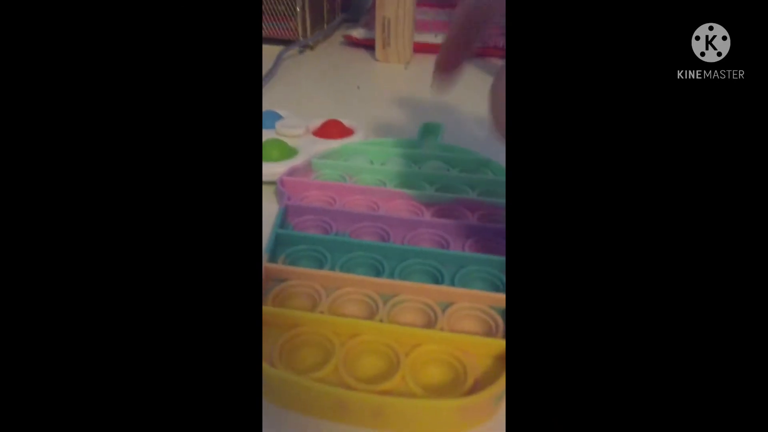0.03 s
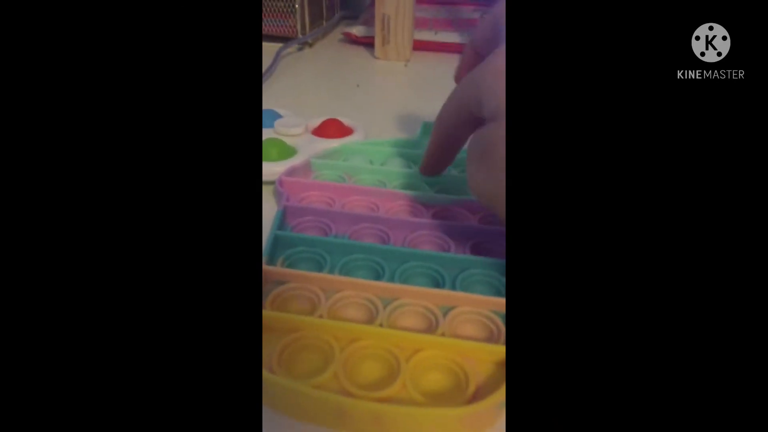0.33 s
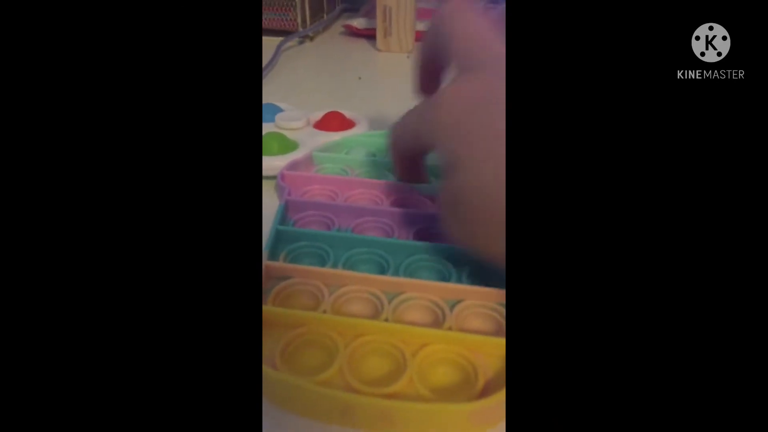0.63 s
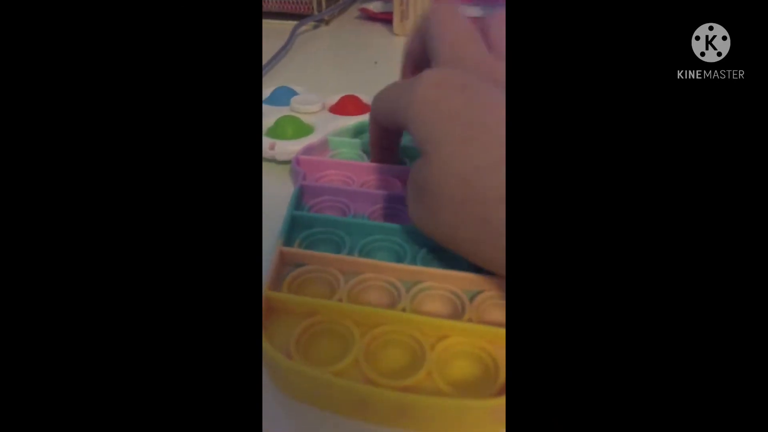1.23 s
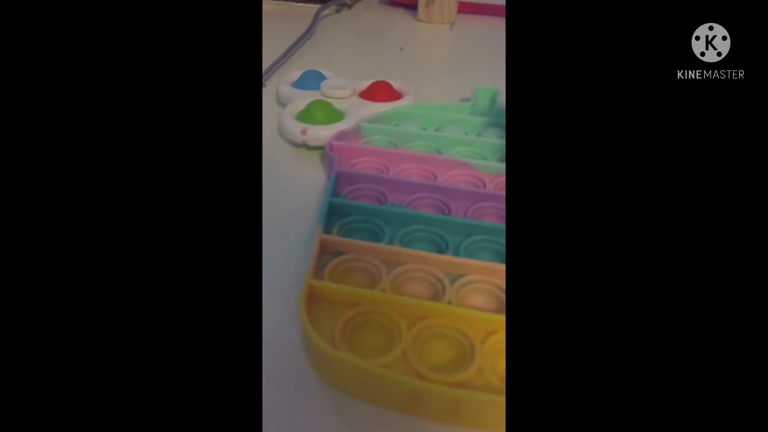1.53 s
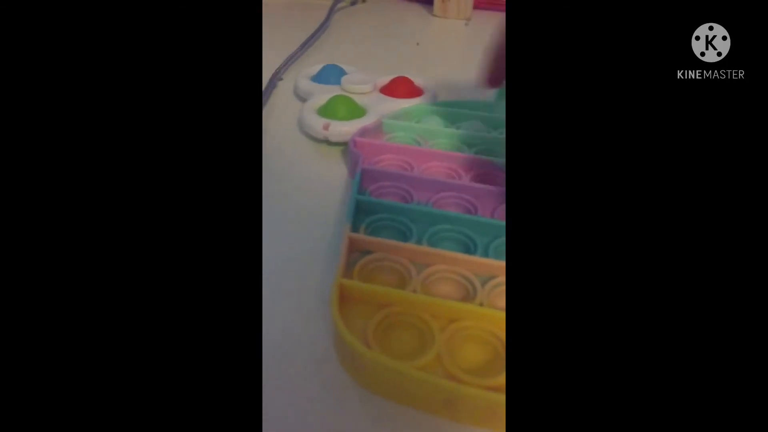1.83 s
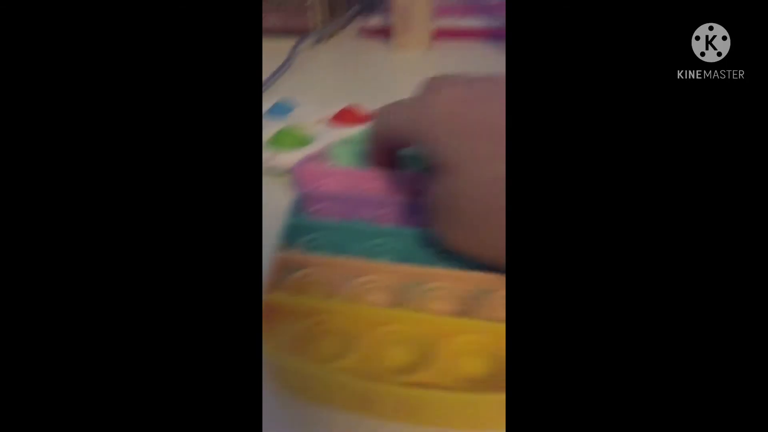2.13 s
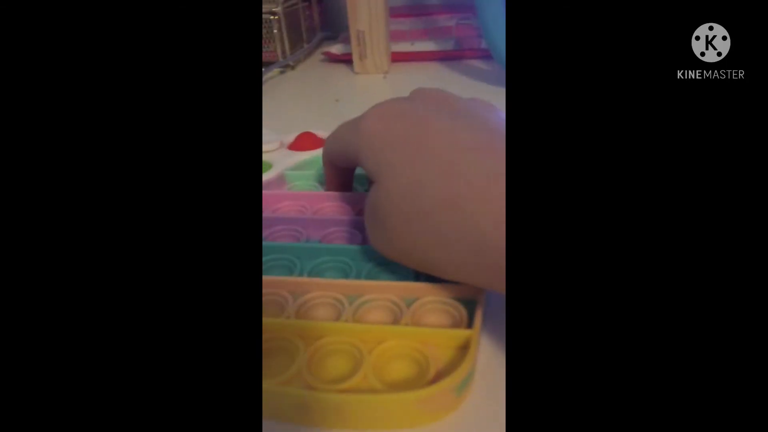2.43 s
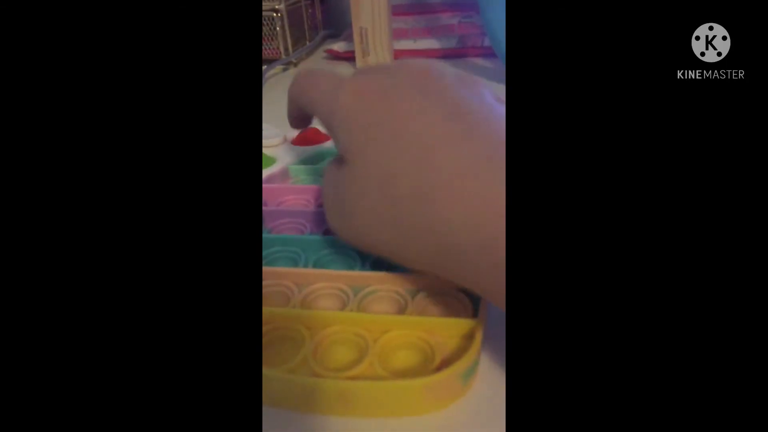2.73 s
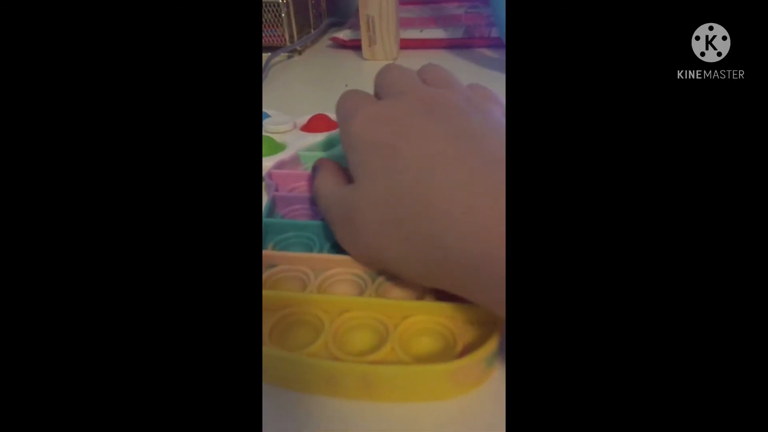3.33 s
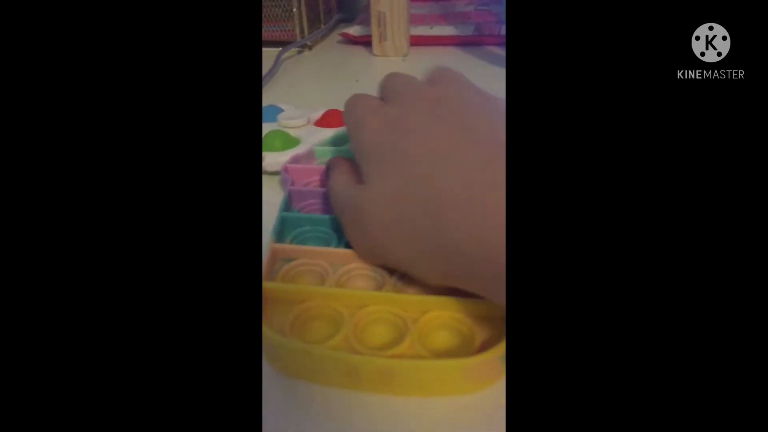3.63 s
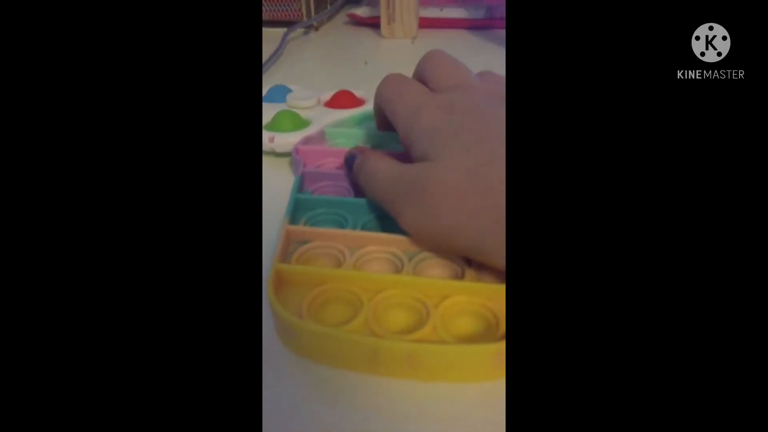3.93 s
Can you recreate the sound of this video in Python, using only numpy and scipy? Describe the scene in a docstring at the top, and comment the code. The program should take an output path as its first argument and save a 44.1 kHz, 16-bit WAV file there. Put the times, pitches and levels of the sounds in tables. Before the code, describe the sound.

Bubbles of a silicone toy pop under fingers, once loudly with a hollow thump, then more softly between faint squeaks. The toy finally knocks hard on the table, heard close up in a small room with a low hum.

```python
"""Fingers push the bubbles of a silicone pop toy on a table, in a quiet room with hiss and a low hum.
First skin rubs and soft presses squeak. At 1.6 s a dome buckles loudly: tiny snaps ring the air
in its cup, and the rubber thumps the table and bounces. Softer pops follow until 2.8 s, then
squeaks, rubs and faint thumps. At 3.8 s a last dome snaps and the toy knocks hard on the table."""
import sys
import numpy as np
from scipy import signal
from scipy.fft import rfft, irfft
from scipy.io import wavfile

SR = 44100
rng = np.random.default_rng(int(sys.argv[2]) if len(sys.argv) > 2 else 0)


def int16_out(signal):
    """Quantize to a 16-bit WAV file."""
    q = np.round(np.clip(np.atleast_2d(signal).T, -1, 1) * 32767)
    wavfile.write(sys.argv[1], SR, q.astype(np.int16))


N = 176400

# dome snaps: start_s, cup_hz, cup_db, overtone_hz, overtone_db, crack_db, flap_db
DOME_SNAPS = [(1.4469, 1690, -38, 2670, -48, -67, -43), (1.456, 1660, -38, 2630, -48, -66, -60),
              (1.636, 1630, -16.5, 2900, -28.5, -30, -25), (1.6473, 1730, -18.5, 2880, -25, -30.5, -15.5),
              (2.091, 1290, -31, 2440, -48, -57, -33), (2.107, 1630, -42, 2880, -49, -58, -42),
              (2.1161, 1620, -35.5, 2980, -46, -64, -35), (2.264, 925, -39, 2270, -42.5, -57, -33.5),
              (2.2703, 1400, -56, 2980, -39.5, -48, -46), (2.2823, 1190, -47, 2900, -65, -62, -35.5),
              (2.289, 1300, -44, 2850, -62, -62, -44), (2.293, 1350, -42, 3000, -56, -61, -54),
              (2.4558, 1470, -47, 3780, -50, -56, -67), (2.468, 1430, -46.5, 4400, -51, -51, -66.5),
              (2.7869, 1750, -46.5, 2960, -57, -70, -36.5), (3.81, 1350, -41, 2950, -62, -42, -40),
              (3.818, 1420, -35, 2320, -38, -43, -49), (3.823, 1750, -29.5, 2430, -36, -50, -31)]
# rubber flap: freq_hz, density_db
FLAP_SPECTRUM = [(50, -35), (220, 2), (500, -6), (1000, 2), (1400, 3.5), (2200, -9), (3500, -14.5),
                 (8000, -42)]
# rubber crack: freq_hz, density_db
CRACK_SPECTRUM = [(500, -36), (2200, -7), (3600, 6.5), (4700, -5), (5600, -4.5), (6300, -22), (8500, -17),
                  (11000, -27), (16000, -33)]
# firm presses: start_s, table_db, slap_db, slap_hz
TABLE_THUMPS = [(.323, -59.5, -49, 490), (1.19, -52, -33, 178), (1.634, -58, -26.5, 210),
                (1.648, -25.5, -19, 161), (1.6536, -48, -15, 432), (2.092, -25, -18, 136.5),
                (2.109, -43, -21.5, 177), (2.271, -38.5, -28, 154), (2.472, -53, -35.5, 142),
                (2.949, -61, -40, 165), (3.019, -55.5, -37, 127), (3.828, -35.5, -41, 476),
                (3.858, -46, -22, 249)]
# table resonances: freq_hz, level_db, t60_s
TABLE_MODES = [(124.7, -0.5, 0.25), (200, -2.5, 0.098), (303, -14, 0.24), (452, -12, 0.13),
               (610, -20, 0.035)]
# rubber sheet thud: freq_hz, density_db
THUD_SPECTRUM = [(60, -55), (160, 9.5), (300, -12), (480, 2), (750, -6), (1250, -12), (3000, -29),
                 (6000, -50)]
# slack dome landings: start_s, level_db
DOME_BOUNCES = [(0.5632, -40), (1.2023, -39.5), (1.6567, -15.5), (2.2835, -32.5)]
# one hollow tap: freq_hz, density_db
BOUNCE_SPECTRUM = [(100, -17), (230, -4.5), (400, -2), (510, 5), (640, -4), (900, -8.5), (2500, -29),
                   (6000, -60)]
# toy on table: start_s, level_db, ring_share, lowpass_hz
TOY_KNOCKS = [(3.8506, -11, 0.22, 1420), (3.8574, 0.5, 0.37, 13000)]
# knock resonances: freq_hz, level_db, t60_s
KNOCK_RING_MODES = [(1225, -18, .05), (1380, -7, 0.037), (1712, -25, .05), (1812, -15, 0.053),
                    (2057, -25, 0.14), (2380, -30, 0.042), (2592, -16, 0.035), (3250, -33, 0.1),
                    (3490, -27, 0.045)]
# knock impact: freq_hz, density_db
BLOW_SPECTRUM = [(40, -35), (150, -18), (310, -8), (550, -9), (850, -14), (1300, -4), (2300, -5),
                 (3700, -5), (4400, -24), (8700, -31), (11000, -43), (16000, -40)]
# grit and rattle after impact: freq_hz, density_db
RATTLE_SPECTRUM = [(80, -27), (320, 6.5), (600, 6), (900, -9.5), (1300, 4.5), (3500, 1), (4300, -8),
                   (5700, -18), (7200, -29), (8700, -9.5), (10700, -32), (13500, -17), (16000, -38)]
# soft presses: peak_s, length_s, pitch_hz, fall_oct_per_length, level_db, overtone_db
RUBBER_SQUEAKS = [(0.108, 0.02, 1794, -0.29, -58, -60.5), (0.556, 0.0083, 1660, 0.13, -39, -65),
                  (1.025, 0.014, 1380, -0.056, -57, -58), (1.0313, 0.0036, 1340, .03, -58, -40.5),
                  (1.1888, 0.0039, 1282, .03, -50, -39.5), (1.1964, 0.012, 1250, 0.014, -50, -45),
                  (1.933, 0.0056, 1600, .4, -41.5, -69), (1.941, 0.0092, 1576, 0.21, -44, -69),
                  (1.9486, 0.0048, 1630, -0.082, -43, -68), (2.954, 0.004, 1340, 0.15, -44.5, -54),
                  (2.966, 0.0064, 1420, 0.17, -51, -58), (3.3488, 0.0083, 1720, .03, -43.5, -59),
                  (3.3605, 0.0085, 1710, -0.017, -44.5, -66), (3.427, 0.0064, 1780, .3, -38, -61),
                  (3.436, 0.011, 1045, 0.31, -42.5, -60)]
# finger strokes: start_s, length_s, level_db, lowpass_hz
SKIN_RUBS = [(-.03, 0.11, -53.5, 1620), (0.045, .018, -53.5, 5000), (0.784, 0.062, -58, 11000),
             (0.999, 0.038, -59, 5240), (1.18, 0.034, -54, 11000), (2.255, 0.028, -51, 9000),
             (2.664, 0.05, -57.5, 3040), (3.078, 0.022, -56.5, 1990), (3.64, 0.037, -57, 2000)]
# skin on silicone: freq_hz, density_db
RUB_SPECTRUM = [(300, -14), (1200, 5.5), (2200, 0), (2900, 6.5), (3600, -0.5), (6500, -7.5), (8200, 3),
                (9100, -6), (16000, -30)]
# room decay: freq_hz, t60_s
ROOM_DECAY = [(100, 0.26), (400, 0.1436), (1500, 0.2656), (3000, 0.19), (8000, 0.21), (16000, 0.23)]
# echo colour: freq_hz, gain_db
ECHO_SPECTRUM = [(100, -10), (450, 11), (1200, -3.5), (1650, -7), (2300, 5.5), (3500, -0.5), (8000, 0),
                 (16000, -2.5)]
# background hiss: freq_hz, density_db
HISS_SPECTRUM = [(20, -17), (45, -25), (65, -12.5), (85, 4), (115, -8), (225, -2), (275, -10.5), (320, -5),
                 (380, -9.5), (700, -15.5), (1600, -19.5), (3500, -21.5), (6200, -24.5), (6900, -28),
                 (8000, -25), (10900, -28.5), (13000, -27), (14700, -31.5)]
# background swell: time_s, level_db
HISS_LEVELS = [(0, -58.5), (.6, -59), (1.3, -56), (2.4, -54.5), (3.2, -53.5), (4, -53)]


def snaps(rise_s=0.00039, choke_s=0.012, cup_gain_db=9, overtone_gain_db=11, crack_gain_db=9):
    """A dome buckles. Returns the air ringing in its cup, and the rubber's flap and crack."""
    cups, rubber, t = np.zeros(N), np.zeros(N), np.arange(SR // 10) / SR
    rise = 1 - np.exp(-(t / rise_s) ** 2)
    choke = np.exp(-(t / choke_s) ** 2)  # fingertip closes the cup
    for start_s, cup_hz, cup_db, overtone_hz, overtone_db, crack_db, flap_db in DOME_SNAPS:
        tone = mode(t, cup_hz, cup_db + cup_gain_db, t60_s=0.013)
        overtone = mode(t, overtone_hz, overtone_db + overtone_gain_db, t60_s=0.014)
        add(cups, start_s, rise * choke * (tone + overtone))
        flap = amp(flap_db) * burst(FLAP_SPECTRUM, t, t60_s=0.043)
        crack = amp(crack_db + crack_gain_db) * burst(CRACK_SPECTRUM, t, t60_s=0.011)
        add(rubber, start_s, rise * (flap + crack))
    return cups, rubber


def slap(cycles, level_db, bend=0.59, bend_cycles=1.1, rise_cycles=0.84, t60_cycles=13.3):
    """Hollow note that starts sharp and sags as the rubber relaxes."""
    turns = cycles + bend * bend_cycles * (1 - np.exp(-cycles / bend_cycles))
    rise = 1 - np.exp(-(cycles / rise_cycles) ** 2)
    return amp(level_db - 60 * cycles / t60_cycles) * np.sin(2 * np.pi * turns) * rise


def thumps(rise_s=0.0017, thud_db=2.5, cutoff_ratio=2.65, highpass_hz=85):
    """Rubber slaps down and rings the table; a higher slap wakes higher modes."""
    out, t = np.zeros(N), np.arange(SR // 2) / SR
    rise = 1 - np.exp(-t / rise_s)
    for start_s, table_db, slap_db, slap_hz in TABLE_THUMPS:
        thud = amp(thud_db) * burst(THUD_SPECTRUM, t, t60_s=0.076, norm_samples=2048)
        table = lowpass((ring(TABLE_MODES, t) + thud) * rise, cutoff_ratio * slap_hz)
        add(out, start_s, amp(table_db) * table + slap(t * slap_hz, slap_db))
    return signal.sosfilt(signal.butter(4, highpass_hz, "high", fs=SR, output="sos"), out)


def bounces(count=4, gap_s=0.0098, gap_spread=0.25, loss_db=4.5):
    """A slack dome bounces on the table: hollow taps, unevenly spaced, each weaker."""
    out, tap = np.zeros(N), click(BOUNCE_SPECTRUM)
    for start_s, level_db in DOME_BOUNCES:
        for k, jitter in enumerate(rng.uniform(-1.016, 1, count)):
            add(out, start_s, amp(level_db - k * loss_db) * tap)
            start_s += gap_s * (1 + gap_spread * jitter)
    return out


def knocks(ring_s=0.081, blow_db=-1.5, rattle_db=-10.5, grit_db=-15.5):
    """The toy hits the table: a damped touch, then a hard blow that rings and rattles."""
    out, t = np.zeros(N), np.arange(SR // 4) / SR
    for start_s, level_db, ring_share, lowpass_hz in TOY_KNOCKS:
        rattle = amp(rattle_db) * burst(RATTLE_SPECTRUM, t, t60_s=0.036)
        grit = amp(grit_db) * burst(RATTLE_SPECTRUM, t, t60_s=0.015)
        damping = np.exp(-t / (ring_s * ring_share))
        hit = (ring(KNOCK_RING_MODES, t) + rattle + grit) * damping
        add(hit, 0, amp(blow_db) * click(BLOW_SPECTRUM))
        add(out, start_s, amp(level_db) * lowpass(hit, lowpass_hz))
    return out


def squeaks(overtone_hz=3004, overtone_fall_oct=0.1025, rise_share=0.67, grain_db=-3.5, rasp_db=-8):
    """Creeping rubber sings in the cup: two gliding tones, rubber grain and skin rasp."""
    out, t = np.zeros(N), np.arange(-SR // 40, SR // 40) / SR
    for peak_s, length_s, pitch_hz, fall_oct, level_db, overtone_db in RUBBER_SQUEAKS:
        progress = np.clip(t / length_s, -1, 1)
        tone = glide(pitch_hz, -fall_oct * progress)
        overtone = glide(overtone_hz, -overtone_fall_oct * progress)
        grain = amp(grain_db) * unit(noise(FLAP_SPECTRUM, len(t)))
        rasp = amp(rasp_db) * unit(noise(RUB_SPECTRUM, len(t)))
        swell = np.exp(-(2 * t / length_s / np.where(t < 0, rise_share, 1)) ** 2)
        squeak = amp(level_db) * (tone + grain) + amp(overtone_db) * (overtone + rasp)
        add(out, peak_s + t[0], swell * squeak)
    return out


def rubs(slips_per_s=4000):
    """Tiny slips of skin on rubber swell and fade with each stroke."""
    out, n = np.zeros(N), SR // 4
    for start_s, length_s, level_db, lowpass_hz in SKIN_RUBS:
        slips = rng.standard_normal(n) * (rng.random(n) < slips_per_s / SR)
        friction = unit(lowpass(colour(slips, RUB_SPECTRUM), lowpass_hz))[:int(length_s * SR)]
        swell = np.sin(np.linspace(0, np.pi, len(friction)))
        add(out, start_s, amp(level_db) * friction * swell)
    return out


def room_echoes(x, build_s=0.0017):
    """Diffuse small-room echoes; each band decays at its own rate."""
    hz, frame_s, bands = signal.stft(rng.standard_normal(SR // 2), SR, nperseg=256)
    decay = amp(-60 * frame_s / lookup(ROOM_DECAY, hz)[:, None])
    tail = signal.istft(bands * decay, SR, nperseg=256)[1]
    build = 1 - np.exp(-(np.arange(len(tail)) / SR / build_s) ** 2)
    tail = colour(tail * build, ECHO_SPECTRUM)
    return signal.fftconvolve(x, tail / np.linalg.norm(tail))[:N]


def room_tone(hum_hz=84.9, hum_width_hz=1.4, hum_vs_hiss_db=-11.5):
    """Soft hiss and a low wavering hum; both grow slowly."""
    hz = np.fft.rfftfreq(N, 1 / SR)
    hum = irfft(rfft(rng.standard_normal(N)) / (1 + ((hz - hum_hz) / hum_width_hz) ** 2), N)
    hiss = noise(HISS_SPECTRUM, N)
    level = amp(np.interp(np.arange(N) / SR, *np.transpose(HISS_LEVELS)))
    return level * (unit(hiss) + amp(hum_vs_hiss_db) * unit(hum))


def amp(db):
    return 10 ** (np.asarray(db) / 20)


def unit(x):
    """Scale to rms 1."""
    return x / np.sqrt(np.mean(x ** 2) + 1e-20)


def lookup(table, hz):
    """Interpolate over log frequency."""
    freq_hz, value = np.transpose(table)
    return np.interp(np.log(hz + 1), np.log(freq_hz + 1), value)


def add(mix, start_s, sound):
    """Mix in place, cropped at both ends."""
    at = round(start_s * SR)
    sound = sound[max(-at, 0):]
    part = mix[max(at, 0):][:len(sound)]
    part += sound[:len(part)]


def lowpass(x, cutoff_hz):
    return signal.lfilter(*signal.butter(2, min(cutoff_hz, 0.45 * SR), fs=SR), x)


def colour(x, spectrum):
    return irfft(rfft(x) * amp(lookup(spectrum, np.fft.rfftfreq(len(x), 1 / SR))), len(x))


def noise(spectrum, samples):
    return colour(rng.standard_normal(samples), spectrum)


def burst(spectrum, t, t60_s, norm_samples=256):
    """Coloured noise decaying from level 1."""
    x = noise(spectrum, len(t))
    return x / x[:norm_samples].std() * amp(-60 * t / t60_s)


def click(spectrum, size=4096):
    """Minimum-phase pulse, peak 1."""
    log_gain = np.log(amp(lookup(spectrum, abs(np.fft.fftfreq(size, 1 / SR)))))
    pulse = np.fft.ifft(np.exp(np.conj(signal.hilbert(log_gain)))).real[:size // 2]
    return pulse / abs(pulse).max()


def mode(t, freq_hz, level_db, t60_s):
    return amp(level_db - 60 * t / t60_s) * np.sin(2 * np.pi * freq_hz * t)


def ring(modes, t):
    return sum(mode(t, *row) for row in modes)


def glide(pitch_hz, shift_oct):
    return np.sin(2 * np.pi * np.cumsum(pitch_hz * 2 ** shift_oct) / SR)


def scene(cup_wet_db=-13, rubber_wet_db=-10, table_wet_db=-8.5, knock_wet_db=-11.5):
    """Toy and table close by, room behind; mono."""
    cups, rubber = snaps()
    table, knock = thumps(), knocks()
    cups = cups + squeaks() + bounces()
    echoes = room_echoes(amp(cup_wet_db) * cups  # cups face the listener: least echo
                         + amp(rubber_wet_db) * rubber
                         + amp(table_wet_db) * table
                         + amp(knock_wet_db) * knock)
    return (cups + rubber + table + knock + rubs() + echoes + room_tone())[None]


def record(dry, cutoff_hz=15800):
    """Clip at full scale, then band-limit."""
    taps = signal.firwin(511, cutoff_hz, window=("kaiser", 9), fs=SR)
    return signal.oaconvolve(np.clip(dry, -1, 1), taps[None], "same")


dry = scene()
out = record(dry)
int16_out(out)
```